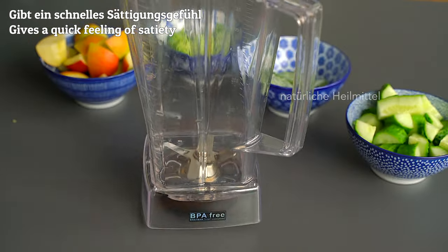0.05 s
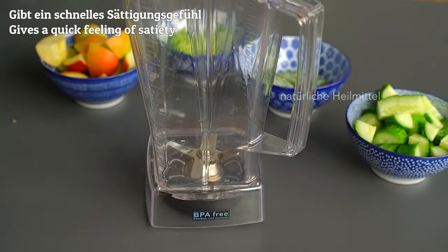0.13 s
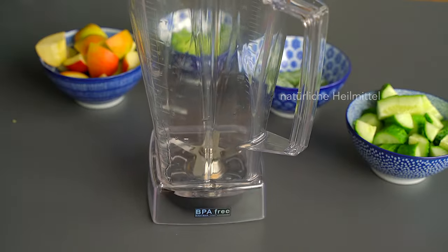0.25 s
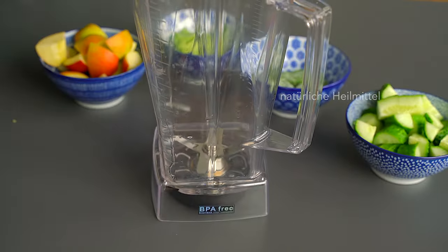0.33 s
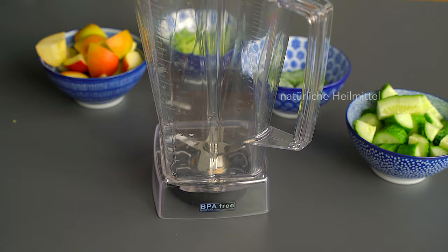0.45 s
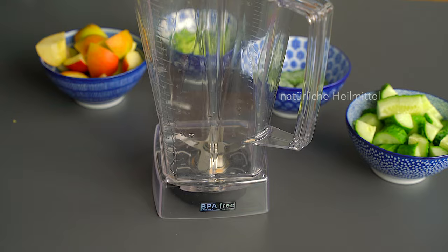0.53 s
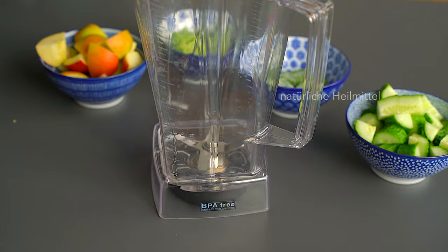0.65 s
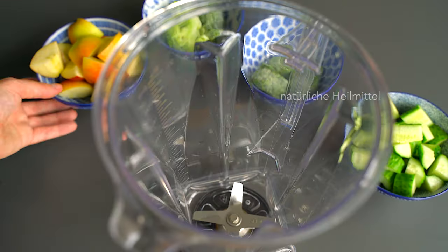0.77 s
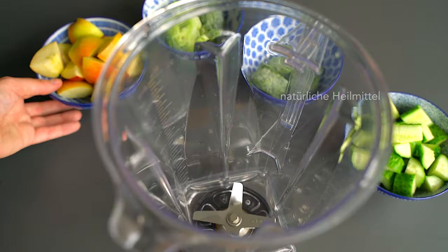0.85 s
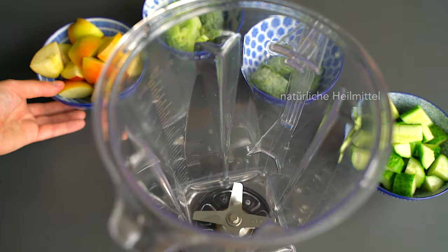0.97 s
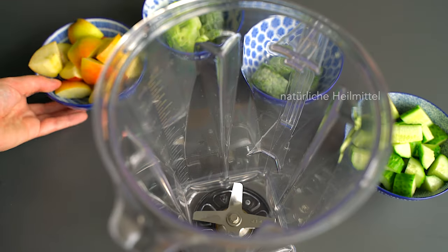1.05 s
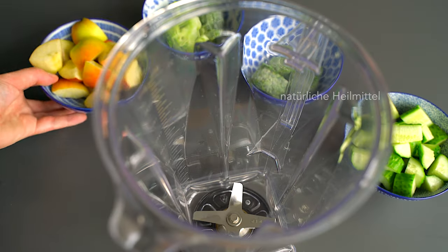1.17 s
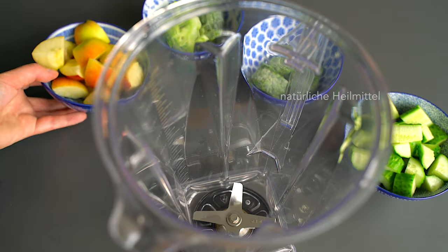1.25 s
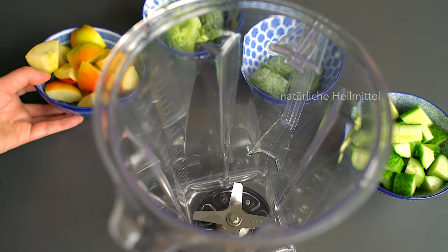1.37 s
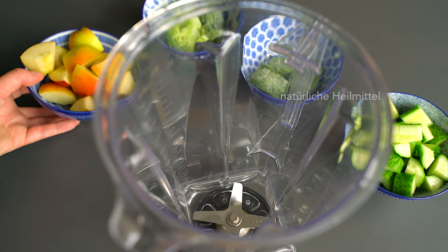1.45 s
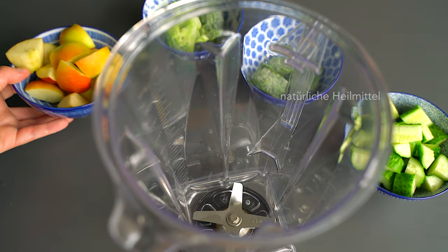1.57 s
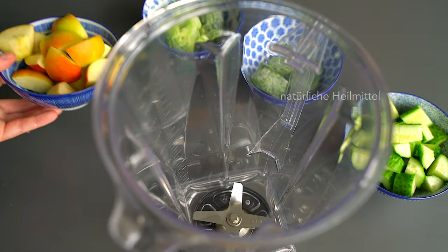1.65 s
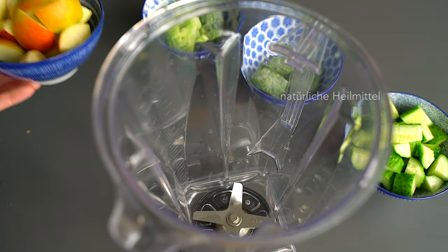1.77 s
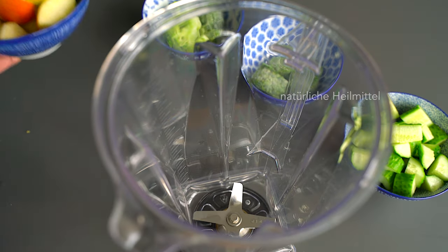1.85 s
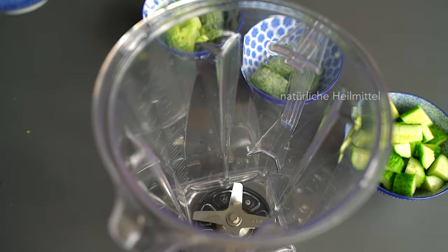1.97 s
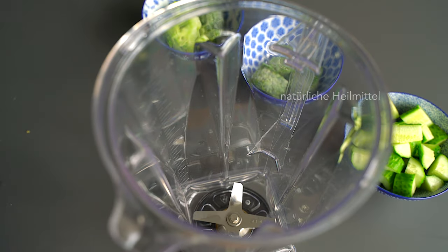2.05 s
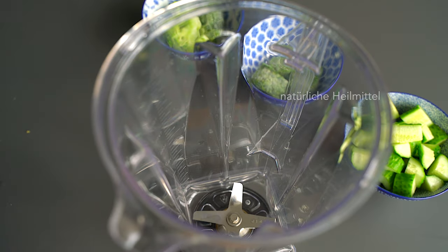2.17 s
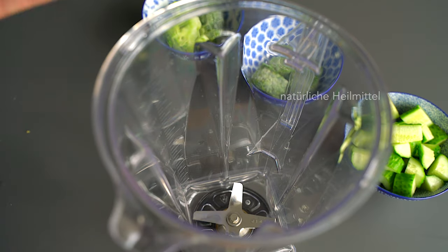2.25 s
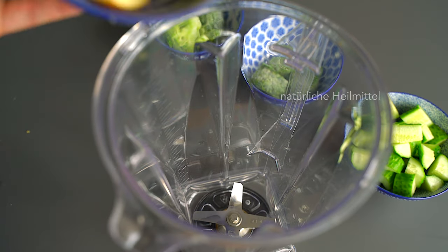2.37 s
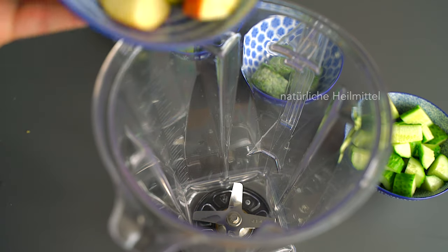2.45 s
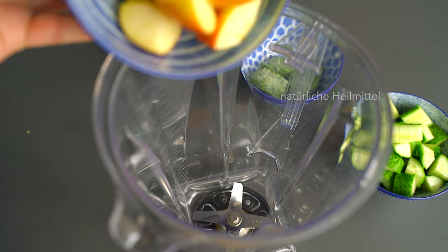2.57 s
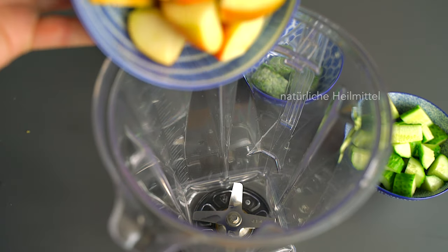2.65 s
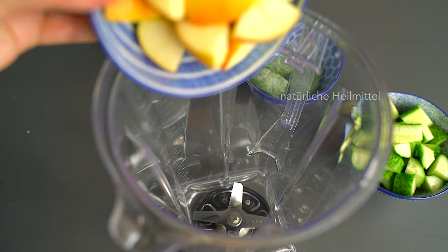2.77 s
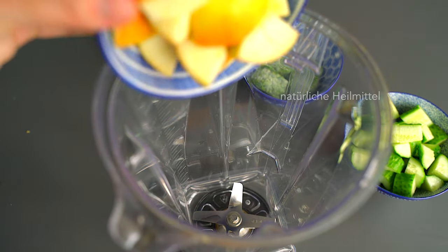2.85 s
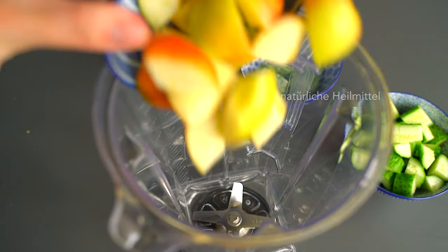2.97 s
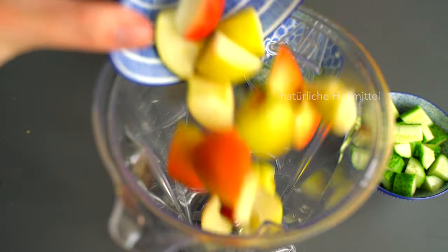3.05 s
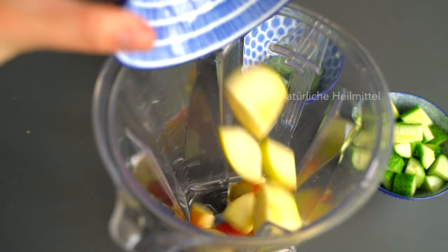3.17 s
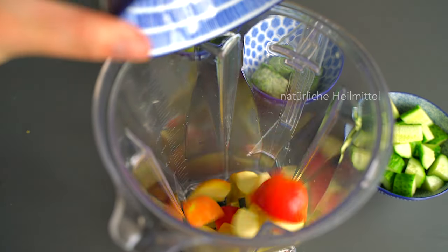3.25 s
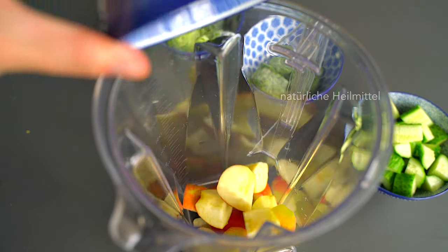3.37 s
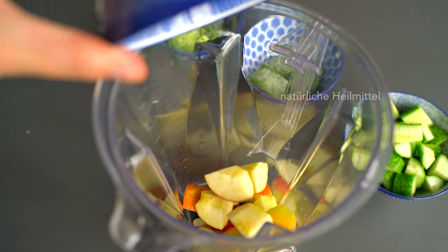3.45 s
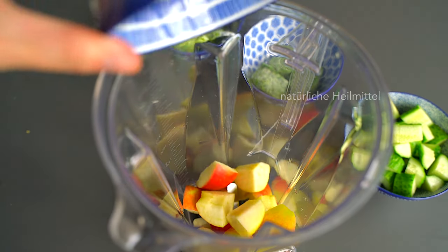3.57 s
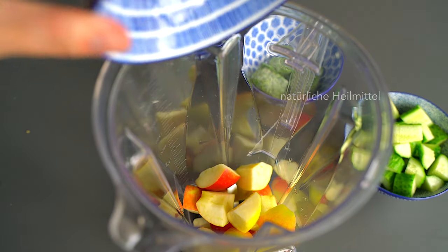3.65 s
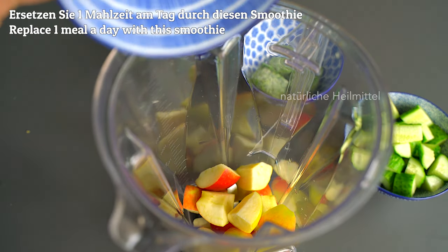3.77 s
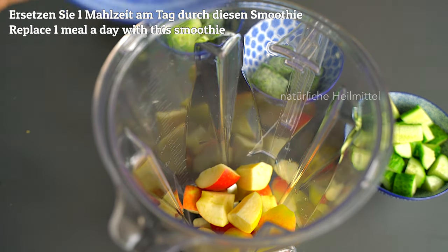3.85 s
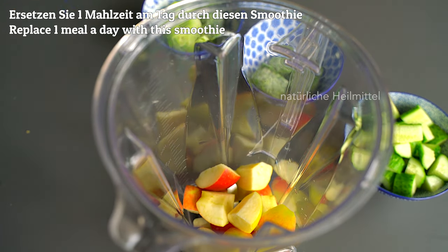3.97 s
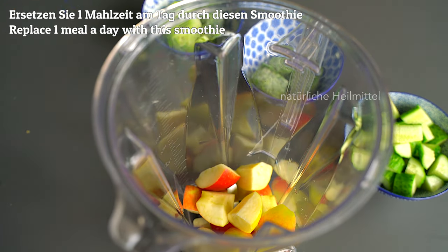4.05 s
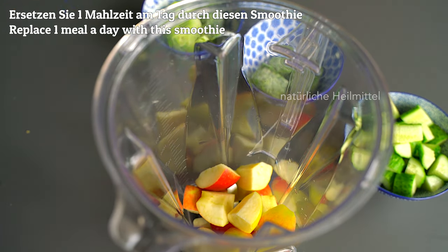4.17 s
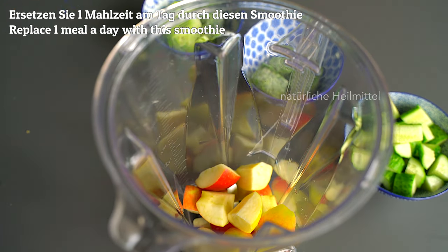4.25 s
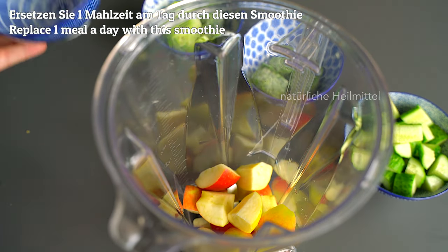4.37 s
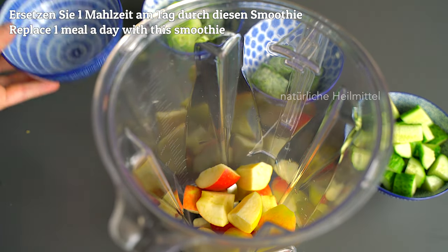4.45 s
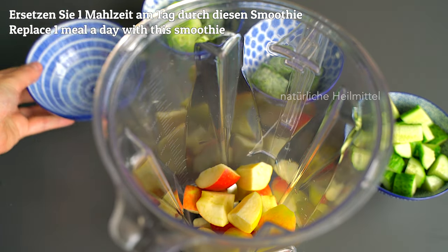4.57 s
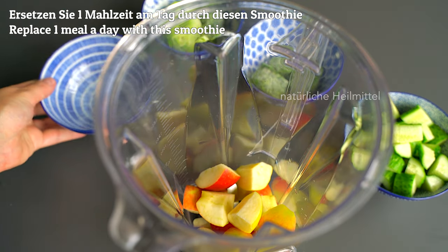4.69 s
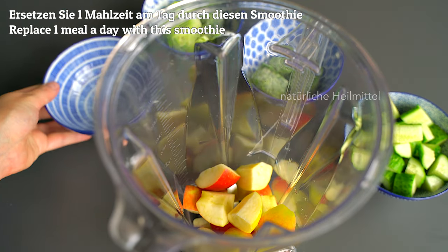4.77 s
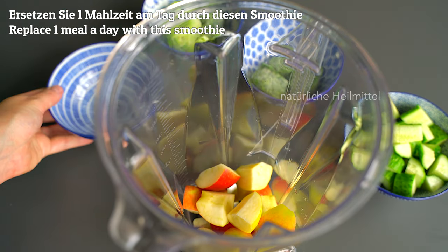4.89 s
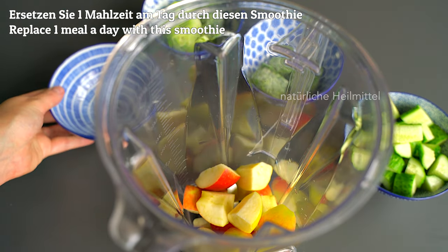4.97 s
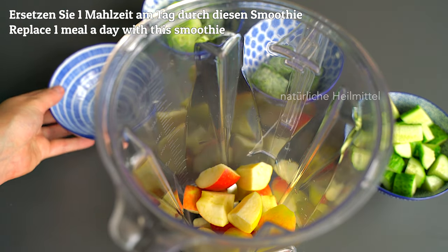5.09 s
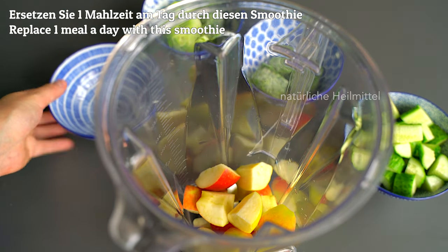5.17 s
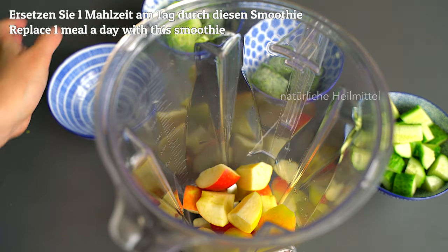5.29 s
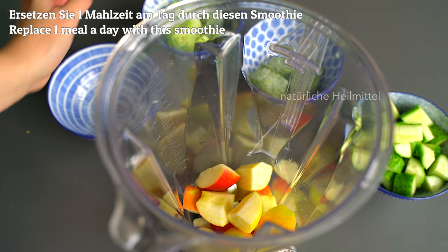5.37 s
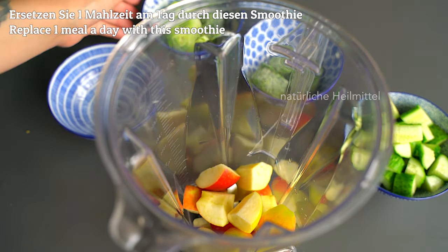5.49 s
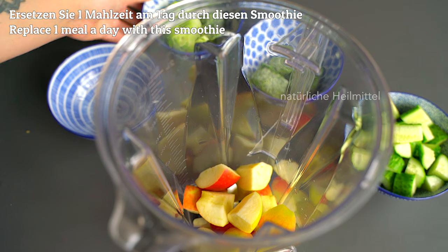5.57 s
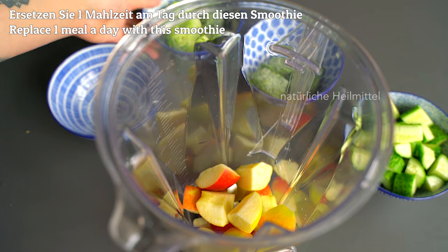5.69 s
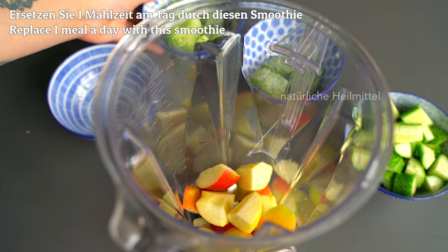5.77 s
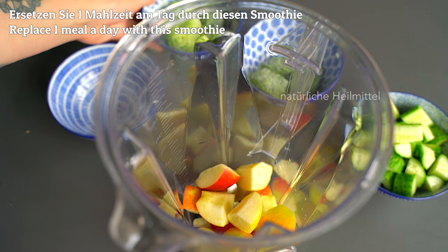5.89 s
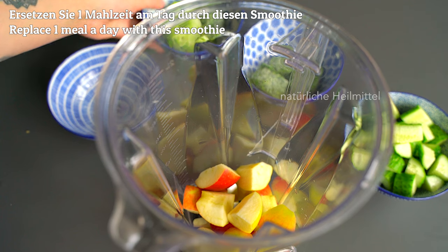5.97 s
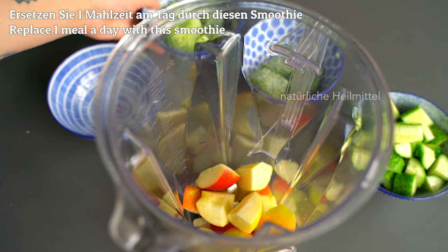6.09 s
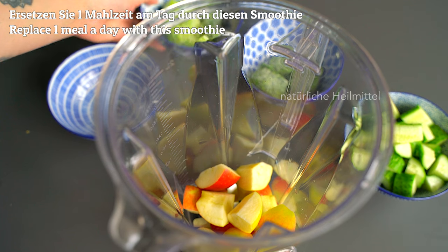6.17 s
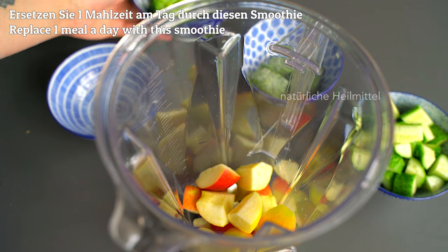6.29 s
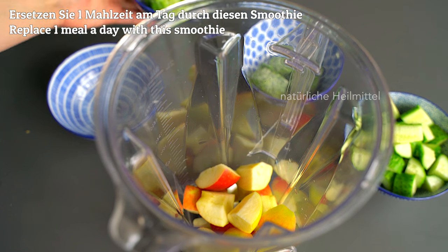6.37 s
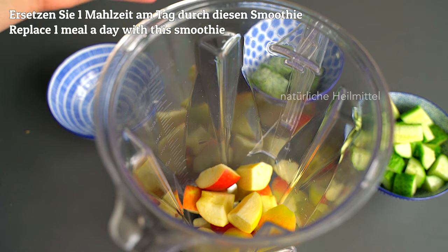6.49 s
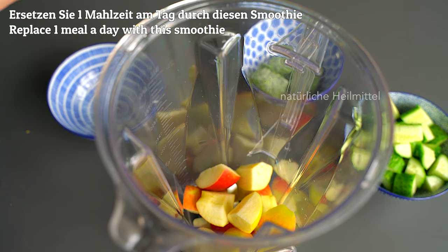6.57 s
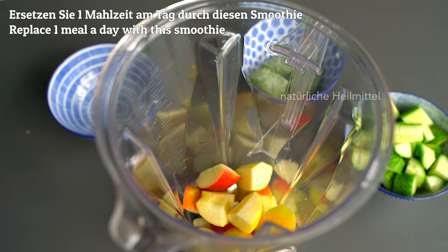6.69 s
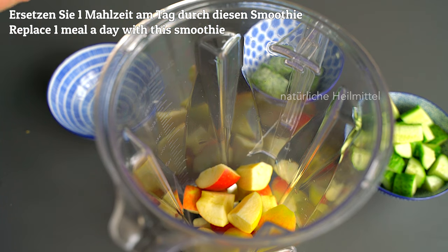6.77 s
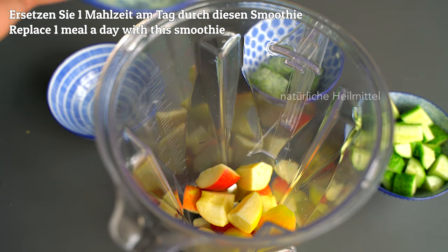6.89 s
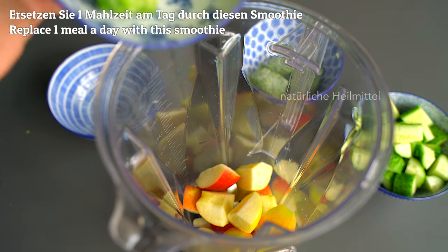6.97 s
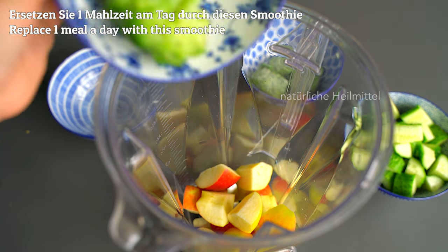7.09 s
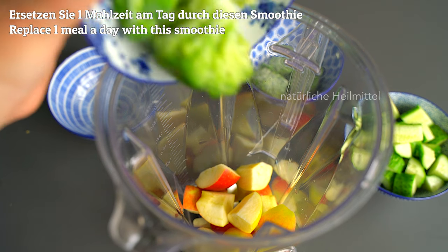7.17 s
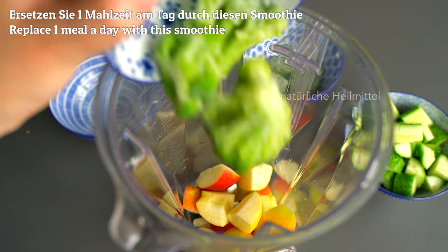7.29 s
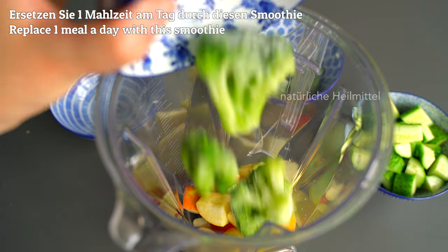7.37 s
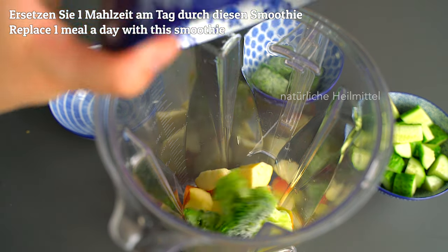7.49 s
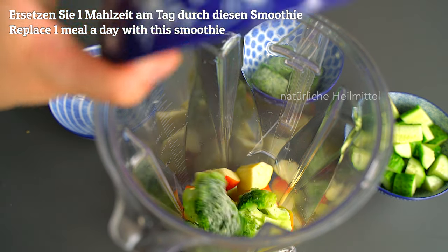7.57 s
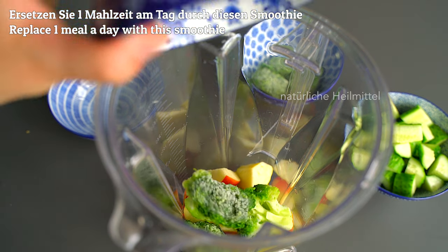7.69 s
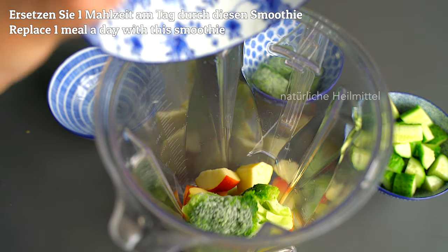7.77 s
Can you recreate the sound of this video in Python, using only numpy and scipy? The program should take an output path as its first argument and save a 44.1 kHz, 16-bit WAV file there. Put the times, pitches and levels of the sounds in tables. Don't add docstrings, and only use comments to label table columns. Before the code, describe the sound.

A quiet kitchen with faint low hush, heard close, hard walls ringing briefly after blows. At 0.1 s an empty plastic jar meets the worktop with a sharp knock; at 0.3-0.5 s it scrapes, tiny squeaks and taps included. From 1.1 to 1.45 s a glazed bowl drags with a grainy rumble. Near-silence until 2.6 s, when ticks and a first light piece sound. At 3.0-3.45 s apple chunks tumble in fast, loud, hollow booms with wet crackle and plastic slaps, stragglers until 3.65 s. At 4.94 s the bowl lands with a heavy knock, rocking twice by 5.07 s. Faint ceramic touches, a low squeak and scuffs come around 5.2-6.2 s, then small ticks. At 7.15-7.35 s frozen greens rasp down glaze; clinks peak at 7.44 s, and greens thump and crackle onto the fruit until 7.7 s, with one faint last knock at 7.84 s.

```python
import sys
import numpy as np
from scipy import signal
from scipy.fft import rfft, irfft
from scipy.io import wavfile
from scipy.ndimage import uniform_filter1d

SR = 44100
rng = np.random.default_rng(int(sys.argv[2]) if len(sys.argv) > 2 else 0)


def ratio(d):
    e = np.asarray(d, float) / 20
    return 10 ** e


def store_pcm(level_fs):
    pcm = np.round(np.clip(level_fs, -1, 1) * 32767).astype(np.int16)
    wavfile.write(sys.argv[1], SR, np.atleast_2d(pcm).T)


N = 345744

# (time
# [s], boom [dB], crack [dB], walls [dB])
APPLE = [(2.678, -15, -31.5, -5), (2.738, -26.5, -53, -5.5), (2.778, -30.5, -69, 13),
         (3.024, -6.5, -26.5, 4.5), (3.066, -8, -27.5, -2), (3.076, -3.5, -29.5, 6.5), (3.156, 0, -20, 6),
         (3.171, 2, -14, -0.5), (3.195, 1.5, -20, -7), (3.207, -0.5, -20, 0.5), (3.242, 2.5, -20.5, 2.5),
         (3.261, -8.5, -21, -15.5), (3.281, -0.5, -17, 7.5), (3.296, 1, -41, -3.5), (3.319, 0, -31, -0.5),
         (3.331, 2, -16, -2.5), (3.341, -8.5, -23, -7), (3.363, -9.5, -23.5, -2), (3.38, -7.5, -48, -26),
         (3.406, -14, -31, 0), (3.417, -5, -27, 11.5), (3.487, -22.5, -42, -9), (3.607, -12.5, -45.5, 4),
         (3.643, -44, -44, -10)]
GREENS = [(7.464, -8, -10, 2.6), (7.481, -1, -19, 1.5), (7.489, 2.5, -12.5, 1.2), (7.519, -8.5, -20.5, 3.1),
          (7.528, -9, -31, 2.5), (7.544, -1, -12.5, 4.3), (7.55, -1, -23, 2.2), (7.562, -5.5, -16.5, 1.1),
          (7.577, -4, -26, 1.5), (7.604, -8, -33, 2), (7.611, -4, -28, 2.9), (7.636, -9, -27.5, 5.4),
          (7.695, 4.5, -32.5, 6.8), (7.837, -24, -38.5, 4.5)]
# (frequency [Hz], level [dB], t60 [s])
JAR = [(355.7, 2, 0.41), (428, 3, 0.095), (575, -6.5, 0.16), (706, -17, 0.1), (757.5, -11.5, 0.16),
       (900.4, -8.5, 0.22), (918.6, -2, 0.12), (1105, -25.5, 0.36), (1175, -10.5, 0.1), (1600, -21, 0.11),
       (2090, -27, 0.012), (2700, -23, .03)]
# (frequency [Hz], level [dB], t60 [s])
SLAB = [(125.1, -2, 0.66), (41.6, -3, .4), (66.4, -1.5, 0.34), (179, 0.5, 0.35), (280, -1.5, 0.12),
        (385, -10, 0.16)]
# (frequency [Hz], level [dB], t60 [s])
BOWL_B = [(1713, -2, 0.41), (3400, -4, 0.19), (5710, -3.5, 0.073), (8380, 0, 0.04), (11640, -9, 0.033),
          (15200, -7, 0.04)]


def rms_one(x):
    return x / np.sqrt(np.mean(x ** 2) + 1e-20)


def in_time(tables):
    gain = np.zeros(N)
    for rows in tables:
        s, level_db = np.transpose(rows)
        gain += ratio(np.interp(np.arange(N) / SR, s, level_db, -200, -200))
    return gain


def at_hz(points, hz):
    table_hz, values = np.transpose(points)
    return np.interp(np.log(hz + 1), np.log(table_hz), values)


def coloured(x, spectrum):
    gain = ratio(at_hz(spectrum, np.fft.rfftfreq(len(x), 1 / SR)))
    return rms_one(irfft(rfft(x) * gain, len(x)))


def grains(per_s, spread_db, clump_db, clump_s):
    clumps = uniform_filter1d(rng.standard_normal(N), max(round(clump_s * SR), 2))
    born = rng.random(N) < per_s / SR
    sizes = ratio(spread_db * np.minimum(rng.exponential(1, N), 4) + clump_db * rms_one(clumps))
    return born * sizes * rng.choice([-1, 1], N) + 1e-18


def resonate(x, hz, width_hz):
    r = np.exp(-np.pi * width_hz / SR)
    feedback = [1, -2 * r * np.cos(2 * np.pi * hz / SR), r * r]
    return signal.lfilter(np.array([1, 0, -1]) * (1 - r * r) / 2, feedback, x)


def width_of(t60):
    return np.log(1000) / np.pi / t60


def through(x, modes, damping):
    total = 0
    for k, (hz, db, t60) in enumerate(modes):
        ring = ratio(db) * rms_one(resonate(x, hz, width_of(t60) / damping))
        total = total + ring * (-1) ** k
    return rms_one(total)


def add(out, s, sound):
    i = round(s * SR)
    out[i:i + len(sound)] += sound[:N - i]


def strike(modes, peak_db, spread_db, rise_s, ring=1., first=1., rest_db=0., shift=0.):
    hz, db, t60 = np.transpose(modes)[:, :, None]
    t = np.arange(round(.5 * SR)) / SR
    lowest = np.arange(len(modes))[:, None] == 0
    hz = hz * np.where(lowest, first, 1)
    db = db + np.where(lowest, 0, rest_db)
    chance = rng.standard_normal((3, len(modes), 1))
    hz = hz * (1 + shift * chance[2] * ~lowest)
    decay = ratio(db + spread_db * chance[0] - 60 * t / (t60 * ring))
    blow = (decay * np.sin(2 * np.pi * hz * t + 0.66 * chance[1])).sum(axis=0)
    blow *= 1 - np.exp(-t / rise_s)
    return ratio(peak_db) * blow / np.abs(blow).max()


def snap(peak_db, hz, t60, breadth, wide):
    t = np.arange(round(.06 * SR)) / SR
    noise = rng.standard_normal(len(t)) * ratio(-60 * t / t60)
    burst = resonate(noise, hz, hz * breadth) + wide * resonate(noise, 7000, 10000)
    return ratio(peak_db) * burst / np.abs(burst).max()


def knock(peak_db, cut_hz, hz, t60):
    click = np.arange(round(.1 * SR)) == 0
    dull = signal.lfilter(*signal.butter(2, min(cut_hz, .4 * SR), fs=SR), click)
    blow = resonate(dull, hz, width_of(t60))
    return ratio(peak_db) * blow / np.abs(blow).max()


def lingering(s, level_db, rise_s, t60):
    power = np.zeros(N)
    power[(s * SR).astype(int)] = ratio(level_db) ** 2
    fade, rise = ratio(-120 / (t60 * SR)), np.exp(-1 / (rise_s * SR))
    stored = signal.lfilter([1], [1, -fade], power + 1e-18)
    return np.sqrt(signal.lfilter([1 - rise], [1, -rise], stored))


def after_landings(level_db, follows, rise_s, t60, frozen_db):
    s, boom_db = np.transpose(APPLE + GREENS)[:2]
    frozen = s >= GREENS[0][0]
    return lingering(s, follows * boom_db + level_db + frozen_db * frozen, rise_s, t60)


def hush():
    # (frequency [Hz], level [dB])
    quiet = [(12, -34.5), (20, -3), (43, 3), (60, -16.5), (86, -6), (108, -15.5), (179, -4.5), (244, -7),
             (273, -10.5), (566, -16.5), (839, -16.5), (913, -17.5), (1900, -29.5), (15200, -42),
             (16500, -62.5)]
    return ratio(-52) * coloured(rng.standard_normal(N), quiet)


def worktop_blows():
    # (time [s], peak [dB],
    # knock frequency [Hz], room [dB])
    feet = [(0.1146, -5, 1270, -10), (.116, -8, 400, -7.5), (0.1183, -8.5, 800, -4.5), (.302, -23, 665, -5),
            (.378, -28, 660, -3), (.421, -20, 575, 5), (.4215, -24, 2900, -12), (.475, -23.5, 690, -10),
            (1.122, -23.5, 696, 3), (1.252, -22, 790, 4), (1.421, -21, 590, -16), (4.9364, 0, 824, 4.5),
            (4.936, -15, 5860, -19), (4.939, -5.5, 574, 4.5), (2.677, -26.5, 206, -8),
            (6.165, -28, 1095, -6), (6.185, -32, 883, -14)]
    # (time [s], peak [dB], knock frequency [Hz], room [dB])
    rocking = [
        (5.0062, -2, 800, -9),
        (5.0678, -6, 880, -7),
    ]
    # (time [s], peak [dB], knock frequency [Hz])
    in_bowl = [
        (2.641, -32, 1600),
        (2.645, -32.5, 1150),
        (2.946, -40, 1400),
        (2.975, -33, 1350),
        (2.996, -33.5, 1280),
    ]
    # (time [s], peak [dB], other modes [dB])
    thumps = [
        (0.109, -22.5, 1),
        (0.381, -35, 12),
        (0.421, -25.5, -7.5),
        (0.474, -29, 0),
        (1.413, -34, -1),
        (4.939, -22.5, 3.5),
    ]
    out, to_room = np.zeros(N), np.zeros(N)
    in_bowl = [tuple(row) + (-15,) for row in in_bowl]
    for blows, cut, cycles in ((feet, 3.54, 7.4), (rocking, 1.8, 7.), (in_bowl, 2.1, 42.)):
        for s, peak_db, hz, room_db in blows:
            blow = knock(peak_db, cut * hz, hz, cycles / hz)
            add(out, s, blow)
            add(to_room, s, ratio(room_db) * blow)
    for s, peak_db, rest_db in thumps:
        add(out, s, strike(SLAB, peak_db, spread_db=0, rise_s=.006, rest_db=rest_db))
    return out, to_room


def kitchen(x, gap_s=0.0026, build_s=0.0035):
    # (frequency [Hz], t60 [s])
    room_t60 = [(100, 0.99), (500, 0.44), (1200, 0.47), (3000, 0.54), (6000, 0.52), (12000, 0.22)]
    t, tail = np.arange(SR) / SR, np.zeros(SR)
    for hz in 60 * 2. ** np.arange(0, 8.5, .5):
        band = signal.butter(2, [hz / 2 ** .25, hz * 2 ** .25], "band", fs=SR, output="sos")
        tail += signal.sosfilt(band, rng.standard_normal(SR)) * ratio(-60 * t / at_hz(room_t60, hz))
    tail *= np.clip((t - gap_s) / build_s, 0, 1)
    return signal.fftconvolve(x, tail / np.sqrt(np.sum(tail ** 2)))[:N]


def pressure():
    # (time of most pressure [s], swell [s], fade [s], body [dB], grit [dB])
    strokes = [
        (0.313, 0.14, 0.072, -22.5, -28),
        (0.381, 0.024, 0.033, -49, -21),
        (0.427, .012, 0.15, -19.5, -29.5),
        (.726, 0.15, 0.098, -37.5, -40.5),
        (1.115, 0.041, .16, -22, -30.5),
        (1.22, 0.037, 0.19, -17, -27.5),
        (1.33, 0.28, 0.2, -28.5, -50),
        (1.445, 0.11, .025, -22.5, -30.5),
        (6.189, 0.048, 0.05, -25, -33),
        (5.861, 0.026, 0.071, -35.5, -41),
    ]
    gains, t = np.zeros((2, N)), np.arange(N) / SR
    for s, swell_s, fade_s, body_db, grit_db in strokes:
        lost_db = 30 * np.maximum((s - t) / swell_s, (t - s) / fade_s)
        gains += ratio(np.array([[body_db], [grit_db]]) - lost_db)
    return gains


def drag():
    # (frequency [Hz], level [dB], t60 [s])
    slab_and_foot = [(118, -14.5, 0.06), (257.4, -1, 0.1), (354, -2, 0.062), (470, 6.5, 0.053),
                     (702, 3, 0.055), (892, 3.5, 0.093), (1150, -8.5, 0.029), (1460, -2.5, 0.077),
                     (1900, -16, 0.0045)]
    # (frequency [Hz], level [dB], t60 [s])
    glaze_modes = [(3700, 2.5, 0.012), (4620, 6, 0.02), (6660, -11, .015), (7500, -6.5, 0.012),
                   (10600, -25, 0.011), (14300, -11, .015)]
    body, grit = pressure()
    chatter = grains(4000, spread_db=2.0, clump_db=4.0, clump_s=0.011)
    glaze = through(chatter, glaze_modes, damping=0.85)
    glazed = (np.arange(N) > SR) & (np.arange(N) < 2 * SR)
    rough = coloured(chatter, [(1200, 9), (2500, 6), (5000, -3), (8000, -17.5), (16000, -21.0)])
    rumble = body * ratio(-11.5) * through(chatter, slab_and_foot, damping=0.7)
    return rumble + grit * ratio(-9) * (rough + 0.43 * glazed * glaze)


def hands():
    # (time [s], peak [dB], centre frequency [Hz])
    ticks = [(2.594, -34.5, 4330), (2.6097, -42, 3170), (2.622, -45.5, 2720), (2.6403, -37, 4970),
             (2.647, -31.5, 2650), (2.7333, -43.5, 3420), (2.775, -42, 2580), (7.39, -49, 5050),
             (3.1298, -41, 2900), (3.142, -23, 2760), (5.249, -39, 2960), (5.2552, -33.5, 3200),
             (5.7057, -47.5, 4700), (6.1635, -34, 4550), (6.186, -37, 4000), (6.7058, -36.5, 5000),
             (6.711, -36.5, 4870), (6.719, -41.5, 4840), (6.9085, -39, 4560), (6.9164, -39, 4940),
             (6.9335, -46.5, 4340), (6.941, -44.5, 4830), (7.1183, -46, 3780), (7.1456, -35, 6740),
             (7.202, -30.5, 4160), (7.2156, -39, 3400), (7.3137, -27, 3280), (7.74, -30, 8400),
             (7.755, -37, 2540), (7.824, -37, 4420)]
    # (time [s], length [s], start frequency [Hz], level [dB], second partial [dB])
    squeaks = [
        (6.455, .04, 1330, -53, 2),
        (.272, .026, 1225, -55, 20),
        (.298, .024, 1170, -55, 20),
        (.325, .024, 1150, -61, 20),
        (5.799, .022, 500, -33, -12),
        (5.847, .024, 735, -44, 9),
    ]
    out = np.zeros(N)
    for s, peak_db, hz in ticks:
        add(out, s, snap(peak_db, hz, t60=.021, breadth=0.42, wide=0.1))
    for s, length, start_hz, level_db, second_db in squeaks:
        count = round(length * SR)
        sag = 5000. * (length - .007) ** 3
        phase = 2 * np.pi * np.cumsum(start_hz * np.linspace(1, 1 - sag, count)) / SR
        upper = 0.56 * np.sin(3 * phase) + 0.38 * np.sin(4 * phase)
        tone = np.sin(phase) + ratio(second_db) * np.sin(2 * phase) + ratio(min(second_db, 0)) * upper
        add(out, s, ratio(level_db) * np.hanning(count) * tone)
    return out


def sliding_pieces():
    # (time [s], level [dB])
    slides = [
        [(2.5, -80), (2.618, -48), (2.698, -72), (2.81, -61), (2.858, -83)],
        [(2.86, -69.5), (3.014, -35), (3.09, -50.5), (3.184, -36), (3.212, -28), (3.3, -32), (3.36, -47),
         (3.47, -49), (3.552, -71)],
        [(3.56, -75), (3.628, -49.5), (3.662, -56), (3.8, -76)],
        [(7.4, -87), (7.502, -31), (7.574, -50), (7.626, -36.5), (7.676, -60), (7.704, -50), (7.776, -72),
         (7.84, -70)],
    ]
    # (frequency [Hz], level per Hz [dB])
    crackle = [(710, -17), (1200, -11), (1430, -14), (2240, -11), (4730, -14), (7010, -25.5),
               (11200, -26.5), (15300, -33), (16500, -42)]
    clicks = grains(15000, spread_db=4.5, clump_db=5.0, clump_s=0.0086)
    return in_time(slides) * coloured(clicks, crackle)


def landings():
    out = np.zeros(N)
    for k, (s, boom_db, crack_db, walls_db) in enumerate(APPLE + GREENS):
        pitch = min(0.94 + .007 * k, 1.08)
        crack_hz, slap_db = (2350, -19.5) if k < len(APPLE) else (3520, -13)
        ring = .85 if s < 3 else .42
        boom = strike(JAR, boom_db - 5, spread_db=5.5, rise_s=0.0017, ring=ring, first=pitch,
                      rest_db=walls_db, shift=0.038)
        add(out, s, boom)
        add(out, s, knock(boom_db + walls_db + slap_db, cut_hz=4300, hz=996, t60=0.02))
        add(out, s, snap(crack_db + 6.0, crack_hz, t60=0.028, breadth=0.63, wide=0.11))
    return out


def heap():
    rattle = grains(500, spread_db=5.0, clump_db=4.5, clump_s=0.01)
    wall_modes = [(626, -0.5, 0.033), (800, 3.0, .03), (1047, 1, 0.029), (1500, -10.5, .02), (2250, -13.5, 0.0078)]
    wall_gain = after_landings(-17.5, follows=1.14, rise_s=.002, t60=0.0062, frozen_db=-0.5)
    settling = grains(3000, spread_db=4.5, clump_db=-4.0, clump_s=.012)
    air_modes = [(355, 2.0, 0.26), (405, -8.5, 0.2)] + JAR[1:-1]
    hum_gain = after_landings(-17.5, follows=1.22, rise_s=.01, t60=.3, frozen_db=-13.5)
    walls = wall_gain * through(rattle, wall_modes, damping=.9)
    return walls + hum_gain * through(settling, air_modes, damping=0.34)


def jar_shake():
    # (time [s], level [dB])
    jolts = [(2.79, -34), (3.06, -28), (3.25, -26), (3.36, -18.5), (3.45, -29), (3.57, -35.5),
             (3.65, -34.5), (7.48, -19), (7.6, -25), (7.69, -35), (7.76, -42)]
    sway = rms_one(resonate(rng.standard_normal(N), hz=40, width_hz=6.7))
    stand = lingering(*np.transpose(jolts), rise_s=0.024, t60=0.2) * sway
    slab_gain = after_landings(-33.5, follows=0.2, rise_s=1e-4, t60=0.34, frozen_db=-4.5)
    return stand + slab_gain * through(rng.standard_normal(N), SLAB[:3], damping=0.19)


def swell():
    out, length_s = np.zeros(N), .056
    t = np.arange(round(length_s * SR)) / SR
    shape = np.sin(np.pi * (t / length_s) ** 1.6)
    add(out, 3.113, ratio(-5) * shape ** 2.1 * np.sin(2 * np.pi * 347 * t))
    return out


def bowls():
    # (time [s], peak [dB], ring share [0-1, low when held], upper modes [dB])
    clinks_a = [
        (5.218, -49.5, 1.0, 0),
    ]
    clinks_full = [
        (5.803, -47, .9, -3),
        (5.852, -46, .2, 2),
        (5.866, -37, .3, -8),
    ]
    clinks_b = [
        (7.2015, -46, 0.37, -2),
        (7.2194, -31.5, 0.21, 4),
        (7.2644, -37, 0.4, 3),
        (7.2953, -21, 0.37, 10.5),
        (7.3203, -45, 0.084, -6),
        (7.424, -28.5, 0.42, 9),
        (7.4445, -9, 0.52, 0.5),
    ]
    # (frequency [Hz], level [dB], t60 [s])
    modes_a = [(3270, 0, .75), (5450, 1, .16), (8150, -12, .1)]
    modes_full = [(1680, 0, .3), (2250, -5, .15), (3400, -4, .6), (3780, -12, .2), (5750, -14, .3)]
    out = np.zeros(N)
    for clinks, modes, spread_db in ((clinks_a, modes_a, 0), (clinks_full, modes_full, 2.5), (clinks_b, BOWL_B, 2.5)):
        for s, peak_db, ring, upper_db in clinks:
            ring = np.clip(ring, .05, 1.5)
            add(out, s, strike(modes, peak_db, spread_db, rise_s=0.00035, ring=ring, rest_db=upper_db))
            add(out, s, snap(peak_db - 11.5, 5160, t60=0.018, breadth=0.68, wide=.8))
    return out


def frost_rasp():
    # (time [s], level [dB])
    frost = [(7.06, -66.5), (7.15, -50.5), (7.185, -51.5), (7.21, -43.5), (7.25, -45.5), (7.3, -40),
             (7.33, -47), (7.36, -68), (7.42, -76)]
    rasp = grains(6000, spread_db=4.0, clump_db=3.5, clump_s=0.012)
    rough = coloured(rasp, [(1200, 0), (2500, 4.5), (7000, 3), (16000, -11)])
    bowl = through(rasp, [(1704, -1, 0.18), (3400, 9.0, .15)] + BOWL_B[2:4], damping=0.54)
    hollow = rms_one(resonate(rasp, hz=2370, width_hz=350))
    return in_time([frost]) * ratio(-1.0) * rms_one(rough + 0.73 * bowl + 0.4 * hollow)


def scene():
    blows, blows_to_room = worktop_blows()
    rubbing = drag()
    inside = sliding_pieces() + landings() + heap() + swell()
    small = hands() + bowls() + frost_rasp()
    room = kitchen(blows_to_room + ratio(-5.0) * rubbing + ratio(-17.5) * inside + ratio(-13.5) * small)
    return (hush() + blows + rubbing + inside + jar_shake() + small + room)[None]


def low_pass(x):
    return signal.sosfilt(signal.butter(12, 16780, fs=SR, output="sos"), x)


def record(dry):
    x = np.clip(dry, -1, 1)
    x = signal.sosfilt(signal.cheby2(12, 60, 16700, fs=SR, output="sos"), x)
    return low_pass(x)


dry = scene()
out = record(dry)
store_pcm(out)
```